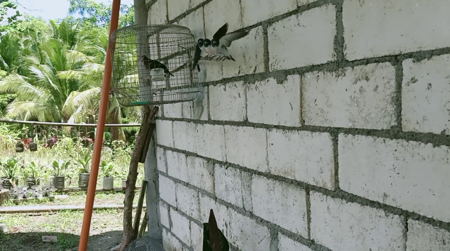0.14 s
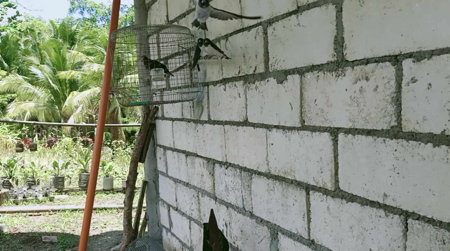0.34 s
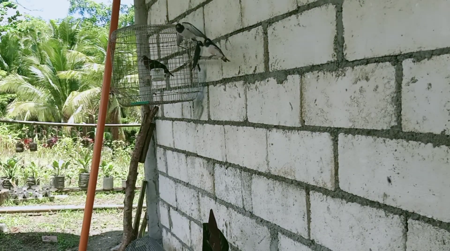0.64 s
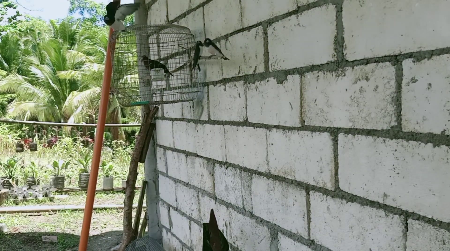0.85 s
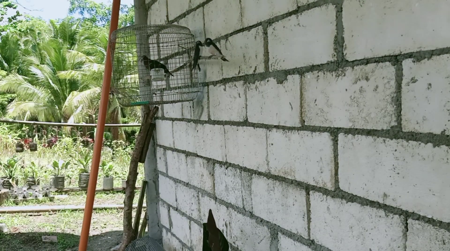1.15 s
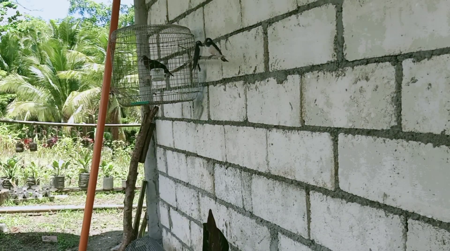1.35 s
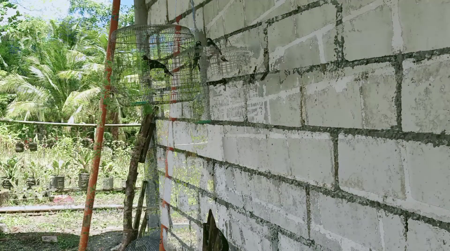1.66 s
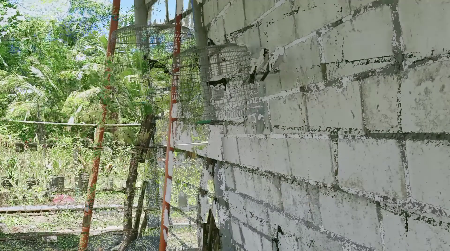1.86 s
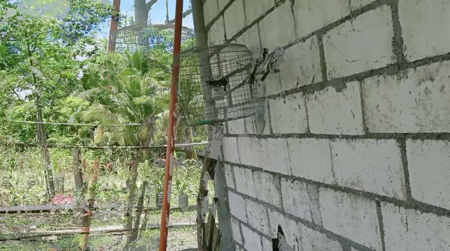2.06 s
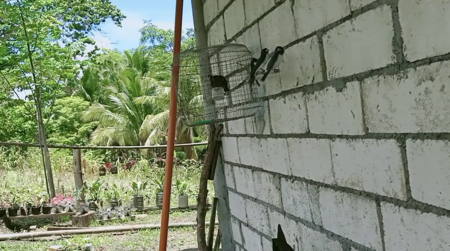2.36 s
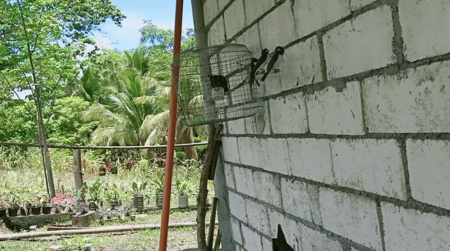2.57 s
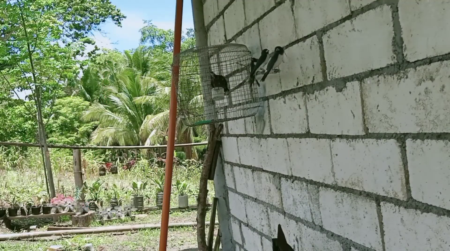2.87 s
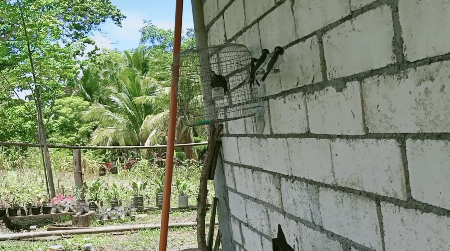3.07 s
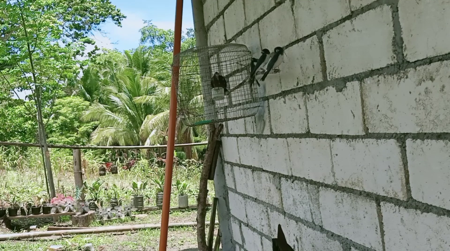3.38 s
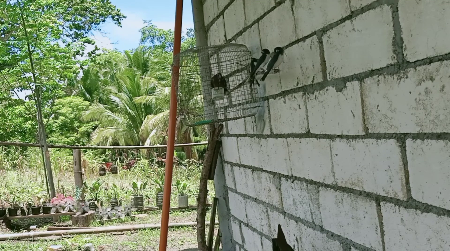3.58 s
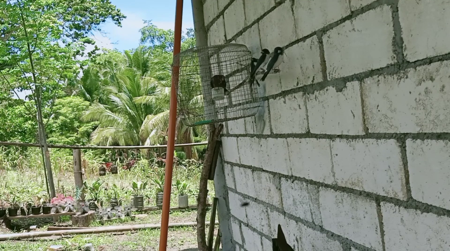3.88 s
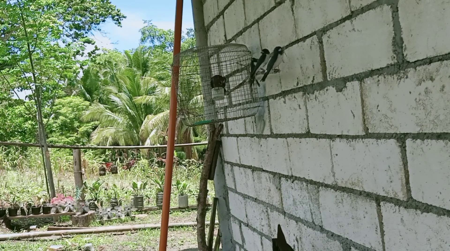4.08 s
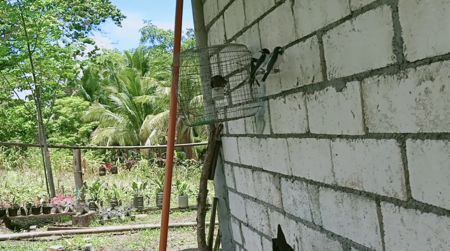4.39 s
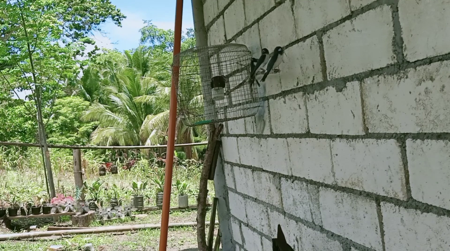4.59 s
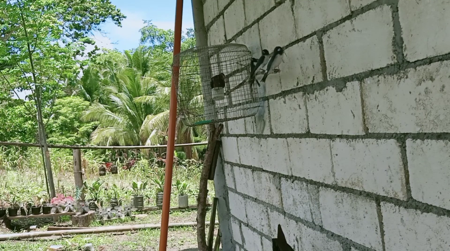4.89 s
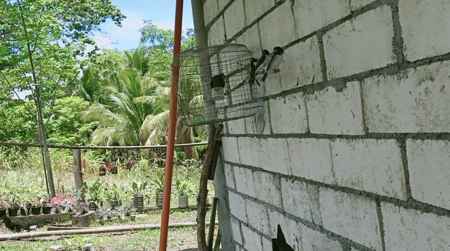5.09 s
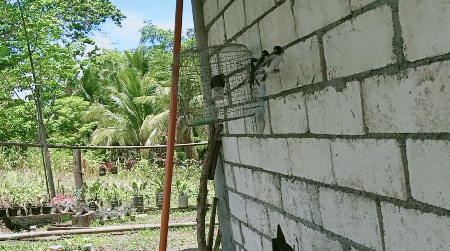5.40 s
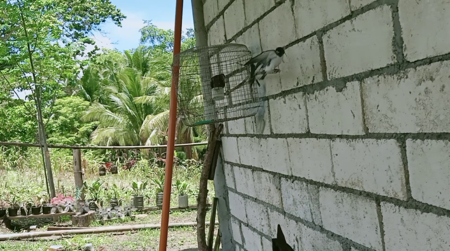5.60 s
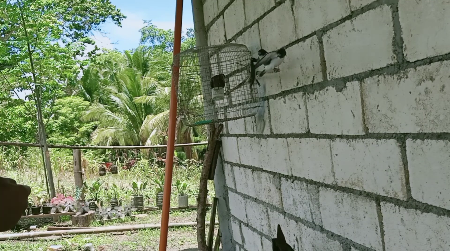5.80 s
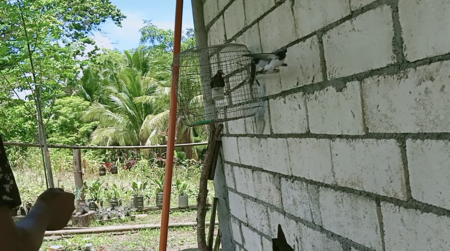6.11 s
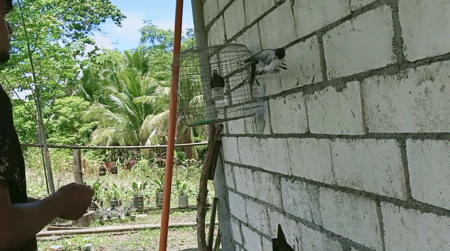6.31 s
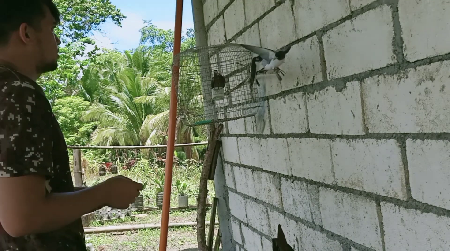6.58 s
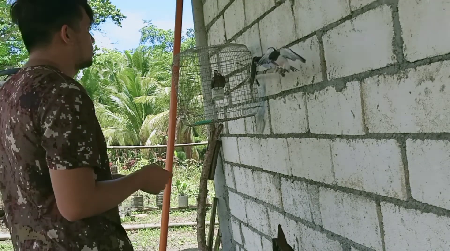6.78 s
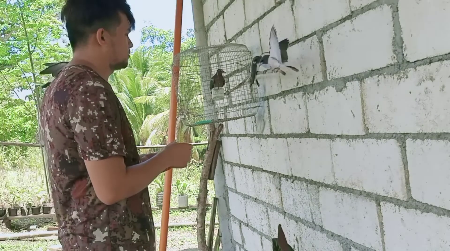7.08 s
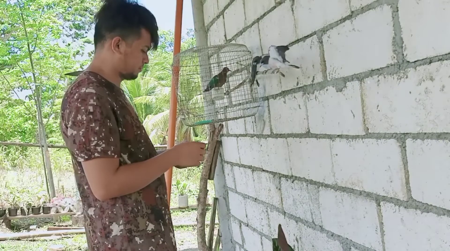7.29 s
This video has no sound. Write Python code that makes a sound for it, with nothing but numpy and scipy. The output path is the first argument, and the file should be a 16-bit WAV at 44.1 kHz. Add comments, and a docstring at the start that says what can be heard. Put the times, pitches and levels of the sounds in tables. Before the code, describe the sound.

Small caged birds give harsh, rising, raspy chirps with wing flutter and wire ticks in a quiet garden, then a rooster crows loudly nearby.

```python
"""Small caged birds give eight harsh rising chirps beside a block wall in a rural garden: rough harmonic stacks.
Wings rustle (pulsed noise), the wire ticks, feet scuff the ground and something bumps (decaying noise).
A rooster nearby crows once in three syllables and a growl: two strong harmonics under a thin stack.
A dog, other cocks (arched harmonic calls), wild birds and chirping insects (gliding sines) come largely as echo.
Air, breeze and insect shimmer are shaped noise; the level at the cage dips briefly after the third chirp."""
import sys
import numpy as np
from scipy import signal
from scipy.fft import rfft, irfft, next_fast_len
from scipy.io import wavfile
from scipy.ndimage import uniform_filter1d

SR = 44100
rng = np.random.default_rng(int(sys.argv[2]) if len(sys.argv) > 2 else 0)


def master(y):
    """Save y as 16-bit WAV."""
    cut = np.clip(np.atleast_2d(y).T, -1, 1)
    pcm = np.round(cut * 32767)  # scale
    wavfile.write(sys.argv[1], SR, pcm.astype(np.int16))


N = 328545
T = np.arange(N) / SR
TOP_HZ = 15600  # limit of the harmonics and of the final low-pass


def undb(db):
    """Decibels to gain."""
    return 10 ** (np.asarray(db) / 20)


def unit(x):
    """Scale to rms 1."""
    return x / np.sqrt(np.mean(x ** 2) + 1e-20)


def ramp(t, length):
    """Rise from 0 to 1 over the given length."""
    return np.clip(t / length, 0, 1)


def bell(f, hz, octaves):
    """Rounded resonance on a log-frequency axis, about 1 at its centre."""
    return np.exp(-.5 * (np.log2((f + 1) / hz) / octaves) ** 2)


def curves(rows, t=T):
    """Columns of a table joined by straight lines over its first column."""
    s, *columns = np.transpose(rows)
    return [np.interp(t, s, c) for c in columns]


def swells(rows):
    """Summed gain of Gaussian swells."""
    return sum(undb(db) * np.exp(-((T - s) / half) ** 2) for s, half, db in rows)


def wander(rate, t=T):
    """Random drift of unit spread, with rate new values a second."""
    return np.interp((t - t[0]) * rate, np.arange(len(t)), rng.standard_normal(len(t)))


def response(points, hz):
    """Gain of a spectrum at the given frequencies."""
    f, db = np.transpose(points)
    return undb(np.interp(np.log(hz + 1), np.log(f), db))


def shaped(x, gain):
    """Filter by a gain that is a function of frequency."""
    size = next_fast_len(len(x))
    hz = np.arange(size // 2 + 1) * SR / size
    return irfft(rfft(x, size) * gain(hz), size)[:len(x)]


def noise(points, size=N):
    """Noise with the given spectrum, rms 1."""
    return unit(shaped(rng.standard_normal(size), lambda f: response(points, f)))


def cycle(hz):
    """Phase in radians of a moving pitch."""
    return 2 * np.pi * np.cumsum(hz) / SR


def stack(hz, phase, throat, count, order=1):
    """Harmonics order to count at random phases, each weighted by the throat."""
    total = 0
    for k in range(order, count + 1):
        gain = throat(k * hz) * (k * hz < TOP_HZ)
        total = total + gain * np.sin(k * phase + rng.uniform(0, 2 * np.pi))
    return total


def add(out, s, x):
    """Mix a sound in at its time."""
    start = int(s * SR)
    x = x[max(-start, 0):N - start]
    out[max(start, 0):max(start, 0) + len(x)] += x


def echoes(x, t60, lag_s, dull_hz):
    """Diffuse reflections: decaying noise after a lag, duller than the source."""
    t = np.arange(SR) / SR
    tail = rng.standard_normal(SR) * np.exp(-np.log(1000) * t / t60) * (t > lag_s)
    tail = shaped(tail / np.linalg.norm(tail), lambda f: 1 / np.hypot(1, f / dull_hz))
    return signal.fftconvolve(x, tail)[:N]


def arched_calls(rows, throat, climb, arch, jitter, waver):
    """Hoarse harmonic calls whose strength and pitch arch, the pitch with a tilt."""
    out = np.zeros(N)
    for s, length, pitch, db in rows:
        t = np.arange(int(length * SR)) / SR
        u = 2 * t / length - 1
        drift = jitter * wander(400, t) + waver * wander(14, t)
        hz = pitch * (1 + climb * u - arch * u ** 2 + drift)
        voice = stack(hz, cycle(hz), lambda f: response(throat, f), count=5)
        add(out, s, undb(db) * unit(voice * (1 - u ** 2)))
    return out


def burst(spectrum, t60):
    """A contact: noise of scattered strength that dies away."""
    t = np.arange(SR // 2) / SR
    return noise(spectrum, len(t)) * undb(0.9 * wander(570, t)) * np.exp(-np.log(1000) * t / t60)


def outdoor_air():
    """Soft steady air noise whose level drifts slowly."""
    # spectrum: (frequency [Hz], gain [dB])
    air_spectrum = [(18, -55), (30, -25), (122, -11.5), (328, -19.5), (735, -13.5), (859, -6.5),
                    (1110, -18), (1300, -14.5), (1410, -25.5), (1730, -18.5), (1920, -21), (3320, -24.5),
                    (3880, -34.5), (15000, -50.5)]
    air_db = -69
    return noise(air_spectrum) * undb(air_db + wander(2.9))


def breeze(gustiness_db=3, calm_db=-79):
    """Low rumble that swells over a calm floor."""
    # swells: (middle [s], half length at 1/e [s], level [dB])
    gusts = [(.45, 0.42, -68.5), (1.36, 0.24, -62), (3.6, 0.27, -65), (4.7, .2, -65), (5.62, .27, -63.5),
             (6.6, .35, -72.5), (7.35, 0.17, -65)]
    spectrum = [(30, -28), (70, -5), (120, 4.5), (180, -1), (280, -13.5), (900, -31), (3000, -72.5)]
    strength = np.hypot(undb(calm_db), swells(gusts))
    return noise(spectrum) * strength * undb(gustiness_db * wander(11))


def insect_shimmer(level_db=-84):
    """Thin shimmer of insects: a band of high noise with a drifting level."""
    spectrum = [(3500, -46), (5500, -10.0), (6700, -6.0), (7400, -16.0), (8500, -42.5)]
    return noise(spectrum) * undb(level_db + 0.81 * wander(2.4))


def gliding_notes(jitter=.015):
    """Thin gliding sines: wild birds give low notes and one short falling high pip; insects give high rising
    chirps."""
    # (start [s], length [s], start pitch [Hz], end pitch [Hz], level before distance gain [dB])
    notes = [(1.68, 0.088, 6200, 7020, -75.5), (1.762, 0.3, 3570, 1900, -77.5),
             (2.927, 0.021, 6000, 5230, -71.5), (3.597, .18, 6220, 6900, -80),
             (4.361, 0.17, 6230, 6980, -82), (5.16, 0.11, 6290, 7000, -74.5), (5.91, .22, 770, 778, -68)]
    out = np.zeros(N)
    for s, length, start_hz, end_hz, db in notes:
        t = np.arange(int(length * SR)) / SR
        hz = np.geomspace(start_hz, end_hz, len(t)) * (1 + jitter * wander(660, t))
        add(out, s, undb(db) * unit(np.sin(cycle(hz)) * np.sin(np.pi * t / length)))
    return out


def far_cocks():
    """Other cocks: long hoarse calls with a shallow pitch arch."""
    # (start [s], length [s], pitch at middle [Hz], level before distance gain [dB])
    far_crows = [(-.3, 1.2, 868, -58.5), (1.65, 0.56, 903, -70.5), (2.12, .36, 891, -59),
                 (2.45, 0.72, 847, -62.5)]
    throat = [(880, 2.5), (1780, -2.5), (2700, -23), (4500, -35.5)]
    return arched_calls(far_crows, throat, climb=0.029, arch=0.067, jitter=0.08, waver=0.03)


def dog():
    """Barks: short hoarse harmonic calls with a steep pitch arch."""
    # (start [s], length [s], pitch at middle [Hz], level before distance gain [dB])
    barks = [(1.97, 0.12, 583.3, -54), (2.42, 0.12, 688.4, -49.5), (2.57, 0.11, 594, -53.5),
             (2.91, 0.13, 578.3, -54.5), (3.02, 0.075, 676.5, -48.5), (3.635, 0.069, 590, -53),
             (3.685, .08, 678, -49), (4.85, 0.096, 670.6, -47.5), (5.445, 0.12, 667.5, -48)]
    # throat: (frequency [Hz], gain [dB])
    dog_throat = [(650, -2.5), (1150, -4.5), (1400, -19.5), (1900, -21), (2800, -38), (5000, -52)]
    return arched_calls(barks, dog_throat, climb=.07, arch=0.11, jitter=0.059, waver=.015)


def growl():
    """Low growl that ends the crow: one long hoarse harmonic call."""
    # (start [s], length [s], pitch at middle [Hz], level [dB])
    growls = [(7.28, .44, 651.5, -39.5)]
    # throat: (frequency [Hz], gain [dB])
    growl_throat = [(650, -2.5), (1300, 1), (1950, -15), (2600, -12.5), (3300, -27)]
    return arched_calls(growls, growl_throat, climb=0.0098, arch=0.0201, jitter=.07, waver=0.0079)


def rooster(tremor_hz=55, tremor=.003, jitter=0.057, thirds=0.37, rattle=0.6, shimmer_db=4.6, waver_db=2.6):
    """Two strong harmonics under a thin stack; at syllable edges the voice breaks into thirds and rattles."""
    # syllables: (start [s], time until the voice breaks [s], release [s], fundamental level [dB],
    #             upper harmonics level [dB], roughness [0-1])
    syllables = [ (6.371, .153, .037, -25.3, -41.5, .14), (6.654, .084, .046, -24.2, -46.3, .08),
                 (6.815, .403, .108, -23.3, -43.7, .03)]
    # pitch arch of each syllable's clear middle: (time [s], pitch [Hz])
    arches = [
        [(6.412, 911.1), (6.448, 918.2), (6.5, 896.6), (6.516, 873.4)],
        [(6.69, 927.6), (6.7, 938.7), (6.735, 937.2)],
        [(6.86, 949.9), (6.898, 978.7), (7.054, 998.5), (7.188, 960.2), (7.216, 932.3)],
    ]
    # throat: (frequency [Hz], gain [dB])
    cock_throat = [(1900, 19.5), (2750, 9), (3000, 3.5), (3700, -0.5), (4300, 1), (4700, 1.5), (4900, -13),
                   (5100, -13), (5600, -3), (6400, -12), (6970, 2), (7400, -10.5), (8100, -30),
                   (15000, -45)]
    attack_s, clear_s, edge_s, bloom_s = .022, .04, .02, 0.065
    soft_db, fade_db, swell_db, bloom_start_db = -19, -20, 2.5, -12.5
    scoop, sag = .15, .06  # shares of the pitch
    hoarse_rough, tires_after_s, tiring_per_s = .66, .29, 1.5
    # throat resonance that the second harmonic climbs into, and its level outside it
    ring_hz, ring_octaves, ring_db, outside_db = 2006, .12, 17.5, -11.5

    def notches(f):
        """Three weak narrow bands."""
        return undb(-11 * bell(f, 5000, .04) - 3 * bell(f, 3000, .06) - 8 * bell(f, 3780, .025))

    out = np.zeros(N)
    for (s, hold, release, db, upper_db, clear_rough), arch in zip(syllables, arches):
        t = np.arange(int((hold + release) * SR)) / SR
        # scoops up hoarsely, clears, grows rough as the bird tires, sags when the voice breaks
        opening = ramp(clear_s - t, edge_s)
        broken = ramp(t - hold, edge_s)
        pitch = curves(arch, s + t)[0] * (1 - scoop * opening - sag * broken)
        hoarse = hoarse_rough * (opening + ramp(t - hold, release / 2))
        tired = tiring_per_s * np.maximum(t - tires_after_s, 0)
        rough = np.minimum(clear_rough + hoarse + tired, 1)

        effort_db = soft_db * (1 - ramp(t, attack_s))
        effort_db += swell_db * (ramp(t, hold) - .5)
        effort_db += fade_db * ramp(t - hold, release) ** 2.4

        shake = tremor * np.sin(2 * np.pi * tremor_hz * t) + 0.0021 * wander(120, t)
        phase = cycle(pitch * (1 + shake + jitter * rough * wander(700, t)))
        # harmonics bloom later than the fundamental
        bloom_db = bloom_start_db * (1 - ramp(t, bloom_s))
        ring = bell(2 * pitch, ring_hz, ring_octaves)
        second_db = outside_db + ring_db * ring + waver_db * wander(53.6, t)
        # roughness frays the high harmonics most
        frayed = phase + .45 * np.minimum(rough + .06, .22) * wander(350, t)

        def throat(f):
            return response(cock_throat, f) * notches(f) * undb(shimmer_db * wander(55, t))

        overtones = stack(pitch, frayed, throat, count=16, order=3)
        overtones /= np.sqrt(uniform_filter1d(overtones ** 2, size=600))
        strong = np.sin(phase) + undb(second_db + bloom_db) * np.sin(2 * phase)
        voice = np.sqrt(2) * undb(db) * strong + undb(upper_db + bloom_db / 2) * overtones
        # every third cycle is stronger; cycle sizes scatter
        beat = 1 + rough * (thirds * np.sin(phase / 3 + wander(80, t)) + rattle * wander(1100, t))
        beat /= np.sqrt(uniform_filter1d(beat ** 2, size=600))
        add(out, s, voice * undb(effort_db) * beat)
    return signal.sosfilt(signal.butter(10, 610, "high", fs=SR, output="sos"), out + growl())


def footsteps():
    """Feet scuff dry ground: dull decaying noise bursts."""
    # (time [s], onset level [dB], t60 [s])
    steps = [(.415, -47.5, 0.28), (4.394, -61.5, 0.38), (5.49, -57.5, 1), (5.6, -50.5, 0.49),
             (6.1, -60.5, 0.53), (6.144, -50, 0.33), (6.234, -54, 0.29), (6.288, -53, 0.59)]
    # spectrum: (frequency [Hz], gain [dB])
    ground = [(100, -17.5), (400, 4), (900, 6), (2000, 0.5), (3500, -7), (7000, -19.5), (9000, -55),
              (15000, -46.5)]
    out = np.zeros(N)
    for s, db, t60 in steps:
        add(out, s, undb(db) * burst(ground, t60))
    return out


def bumps(t60_s=0.58):
    """Dull hollow bumps: noise through three low resonances, softly struck and decaying."""
    # (time [s], level before the decay [dB])
    hits = [(5.635, -50.5), (5.684, -49), (6.26, -58.5), (7.219, -59)]
    # resonances: (frequency [Hz], width [Hz], gain [dB])
    modes = [(130, 43, -12.5), (325.4, 31, 0.5), (610, 320, -15)]

    def body(f):
        return sum(undb(db) / (1 + (2 * (f - hz) / width) ** 2) for hz, width, db in modes)

    out = np.zeros(N)
    t = np.arange(SR // 2) / SR
    envelope = np.minimum(t / 0.0077, 1) * np.exp(-np.log(1000) * t / t60_s)
    for s, db in hits:
        ring = unit(shaped(rng.standard_normal(len(t)), body))
        add(out, s, undb(db) * ring * envelope)
    return out


def wire_ticks(t60_s=0.07):
    """Claws on the cage wire: short bright noise bursts."""
    # (time [s], onset level [dB])
    ticks = [(0.679, -57.5), (1.357, -46), (1.457, -44), (1.616, -41), (5.572, -47.5), (5.589, -45),
             (5.915, -55)]
    # spectrum: (frequency [Hz], gain [dB])
    wire = [(500, 0.5), (1500, 0.5), (3000, 8.5), (6800, 5.5), (8500, -19), (15000, -38.5)]
    out = np.zeros(N)
    for s, db in ticks:
        add(out, s, undb(db) * burst(wire, t60_s))
    return out


def wings(beat_hz=16, depth_db=3, rustle_db=-67.5, rustle_ends_s=1.64):
    """Feathers swish on every uneven wing beat, in flurries over an early restless rustle."""
    # flurries: (middle [s], half length at 1/e [s], level [dB])
    flurries = [(.03, .13, -59.5), (.8, 0.27, -62.5), (1.33, 0.13, -55.5), (1.61, .05, -55),
                (7.38, .14, -56)]
    # spectrum: (frequency [Hz], gain [dB])
    feathers = [(60, -11), (150, -3.5), (350, -2), (900, 1), (2500, -2.5), (4500, -14.5), (7000, -12),
                (8500, -32), (15000, -43.5)]
    beat = np.sin(cycle(beat_hz * (1 + .2 * wander(11.0))))
    rustle = undb(rustle_db) * ramp(rustle_ends_s - T, 0.057)
    strength = np.hypot(swells(flurries), rustle)
    return noise(feathers) * strength * undb(depth_db * beat + 1.5 * wander(180))


def birds(second_ratio=.9, low_hz=1750, high_hz=4650, beak_follow=.58, brighten=0.67, hiss_db=-5):
    """Each chirp climbs, flicks up and drops; the two sides of the syrinx sing slightly apart."""
    # (start [s], rise [s], pitch at mid rise [Hz], further climb [share of pitch], level [dB],
    #  beak resonance [Hz], its boost [dB], low resonance [dB], high resonance [dB],
    #  second voice [dB], rasp [0-1])
    chirps = [ (.945, .109, 750, 0.078, -24, 3750, 8.5, 3, 5.5, -6, 0.2),
              (1.193, 0.087, 723, .12, -28, 3530, 5, -2, 3, -6, 0.21),
              (1.478, .086, 715, 0.11, -28.3, 3300, 4, -.5, 1.5, -5, .27),
              (2.121, .1, 793, .018, -25.5, 3160, 21.5, 3.5, -2, -16, .13),
              (2.425, .091, 697, .12, -27, 3100, 14, 2, 2.5, -9, .19),
              (3.135, .12, 651, 0.07, -32.7, 3280, 7.5, 1.5, 2, -7.5, .23),
              (4.511, .11, 788.3, 0.017, -27, 3040, 20, 5, -1, -18, 0.16),
              (4.854, .098, 699.5, .083, -28.3, 2690, 7, 0, 8.5, -7, .17)]
    # throat: (frequency [Hz], gain [dB])
    bird_throat = [(600, -34), (950, -9), (1400, -7), (2200, 1), (3200, 1), (5000, 1.5), (6800, -4.5),
                   (7600, -18.5), (8600, -29), (10500, -33.5), (15000, -36.5)]
    start_hz, top_hz, end_hz, knee_ratio = 419.7, 944, 580, .893
    swell, fade, soft_db, fade_db = .53, .31, -22, -24.5  # times as shares of the rise
    beak_octaves_per_db = 0.02  # a stronger beak resonance is also wider
    stages = [0, .29, .53, .8, .87, .97, 1.2]  # shares of the rise
    jitter, wobble, flutter, uneven_db = .04, .045, .9, 15

    out = np.zeros(N)
    for s, rise, pitch, climb, db, beak_hz, boost_db, low_db, high_db, second_db, rasp in chirps:
        t = np.arange(int(rise * (1 + fade) * SR)) / SR
        u = t / rise
        effort_db = soft_db * (1 - ramp(u, swell)) ** 2 + fade_db * ramp(u - 1, fade) ** 1.77
        # leap to a knee, climb to a shoulder, flick to the top, drop
        shoulder = pitch * (1 + climb)
        flick = shoulder + .3 * (top_hz - shoulder)
        path = [start_hz, knee_ratio * pitch, pitch, shoulder, flick, top_hz, end_hz]
        glide = uniform_filter1d(np.interp(u, stages, path), size=160)
        # the beak opens as the pitch climbs and takes its resonance along
        beak = beak_hz * (glide / pitch) ** beak_follow
        width = beak_octaves_per_db * boost_db

        def tract(f, centre):
            resonances_db = boost_db * bell(f, centre, width)
            resonances_db = resonances_db + low_db * bell(f, low_hz, 0.43) + high_db * bell(f, high_hz, .17)
            return response(bird_throat, f) * undb(resonances_db)

        def throat(f):
            # a soft voice is dull; in a raspy one every harmonic swells and sinks by itself
            tilt_db = brighten * effort_db * np.log2(np.maximum(f / beak_hz, 1))
            return tract(f, beak) * undb(tilt_db + uneven_db * rasp * wander(70.3, t))

        crack = np.clip(3.6 * (u - .87), 0, .6)  # the voice breaks up over the top
        voice = 0
        for ratio, side_db in ((1, 0), (second_ratio, second_db)):
            shake = jitter * (rasp + crack) * wander(900, t) + wobble * rasp * wander(110, t)
            hz = glide * ratio * (1 + shake)
            voice = voice + undb(side_db) * stack(hz, cycle(hz), throat, count=24)
        voice = unit(voice) * (1 + flutter * rasp * wander(450, t))
        breath = unit(shaped(rng.standard_normal(len(t)), lambda f: tract(f, beak_hz)))
        hiss = rasp * undb(hiss_db) * breath
        edges = np.minimum(np.minimum(t, t[-1] - t) / 0.0071, 1)
        add(out, s, undb(db) * unit((voice + hiss) * undb(effort_db) * edges))
    return out


def scene(bird_yard_db=-14, cock_yard_db=-13, slap_db=-19, slap_s=0.068, far_direct_db=-4, far_echo_db=-2):
    """The cage hangs close to the wall; the far layer arrives largely as echo."""
    yard_t60_s, far_t60_s = 0.51, 0.72
    garden = outdoor_air() + breeze() + insect_shimmer()

    far = dog() + far_cocks() + gliding_notes()
    far_echo = echoes(far, t60=far_t60_s, lag_s=.012, dull_hz=3970)
    far = undb(far_direct_db) * far + undb(far_echo_db) * far_echo

    # scattered echoes of the crow start almost at once; one distinct return follows soon after
    cock = rooster()
    slap = np.interp(T - slap_s, T, cock)
    cock_yard = echoes(cock, t60=yard_t60_s, lag_s=0.012, dull_hz=8000)
    cock = cock + undb(slap_db) * slap + undb(cock_yard_db) * cock_yard

    cage = birds() + wire_ticks() + footsteps() + bumps() + wings()
    wall = undb(-8.5) * echoes(cage, t60=.1, lag_s=.004, dull_hz=9000)
    cage = cage + wall + undb(bird_yard_db) * echoes(cage, t60=0.27, lag_s=0.02, dull_hz=6050)
    # the level of this group dips briefly after the third chirp
    cage *= undb(np.interp(T, [1.655, 1.67, 1.9, 2], [0, -25, -25, 0]))
    return (cage + cock + far + garden)[None]


def record(dry):
    """Steep elliptic low-pass at TOP_HZ."""
    return signal.sosfilt(signal.ellip(10, .2, 80, TOP_HZ, fs=SR, output="sos"), dry)


dry = scene()
out = record(dry)
master(out)
```